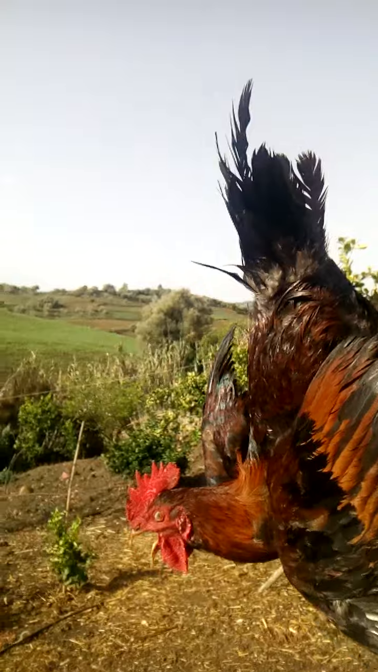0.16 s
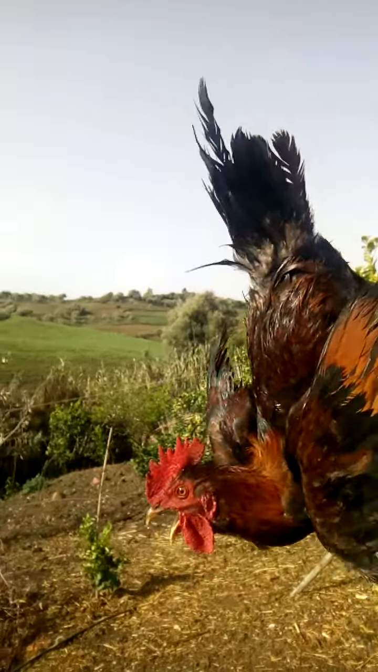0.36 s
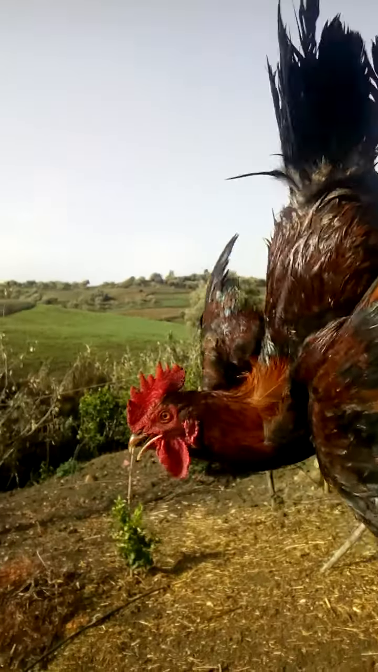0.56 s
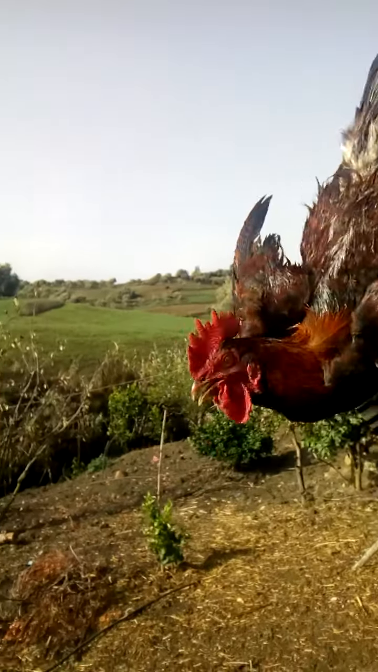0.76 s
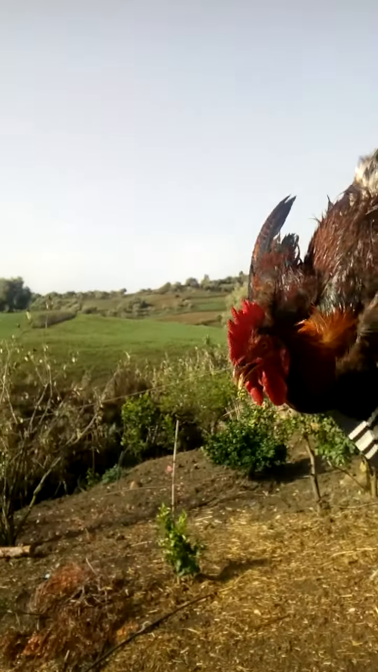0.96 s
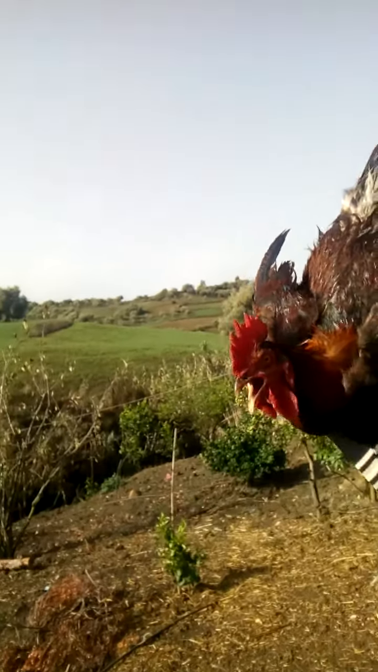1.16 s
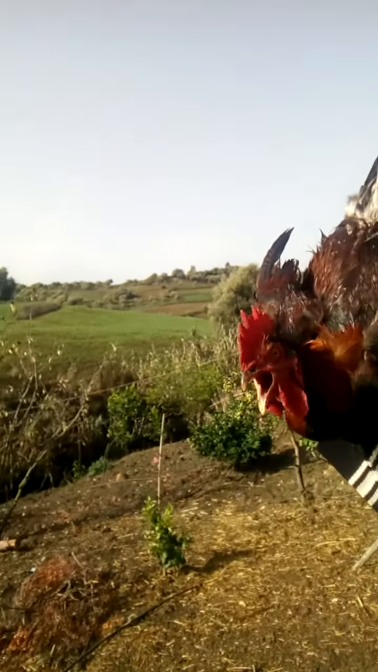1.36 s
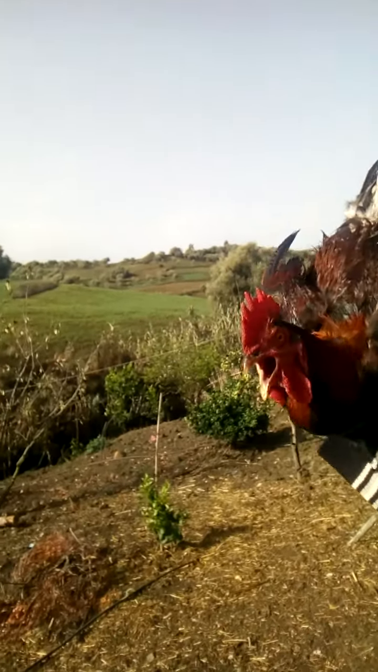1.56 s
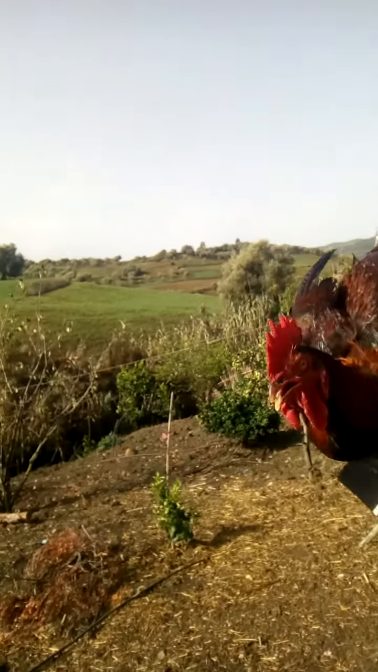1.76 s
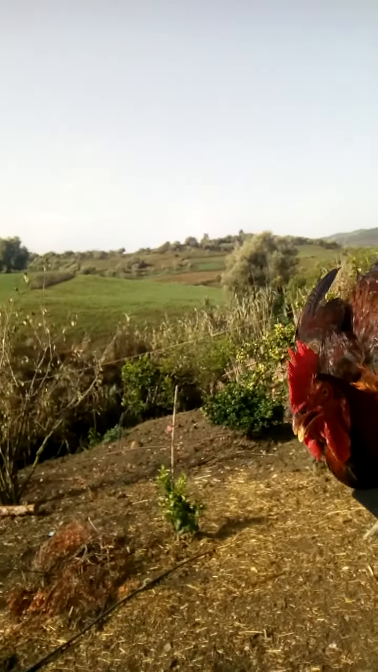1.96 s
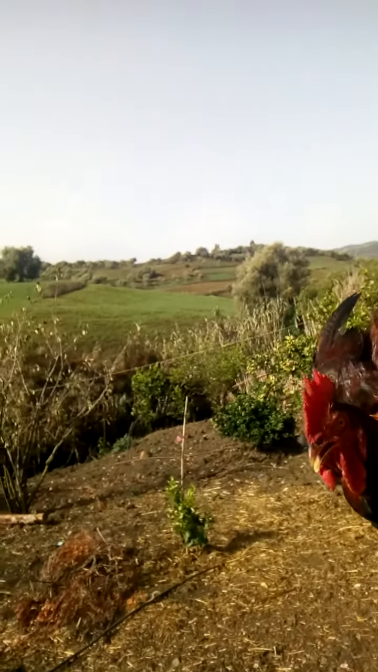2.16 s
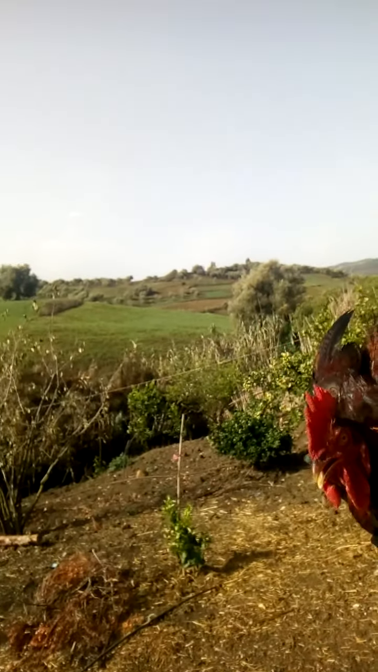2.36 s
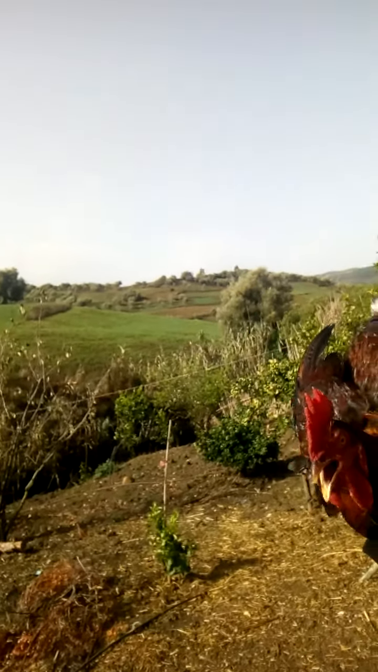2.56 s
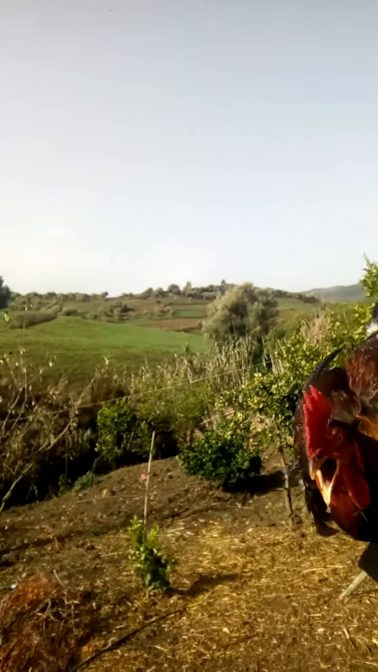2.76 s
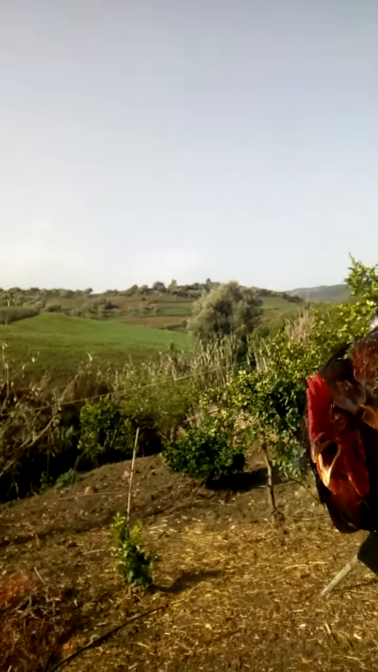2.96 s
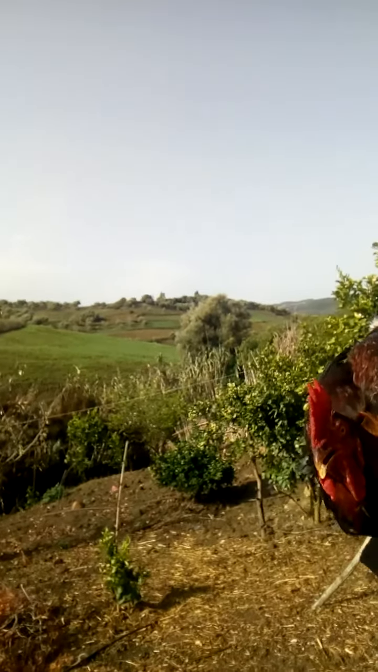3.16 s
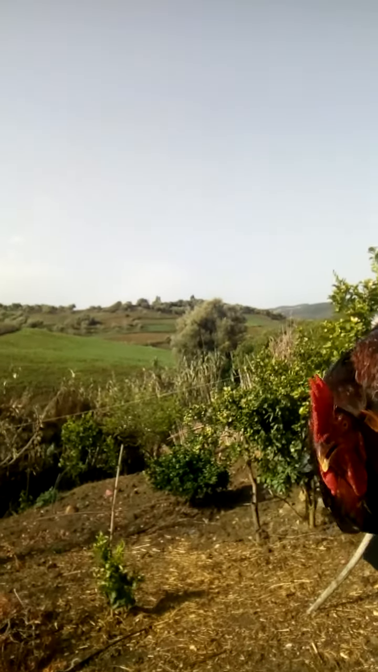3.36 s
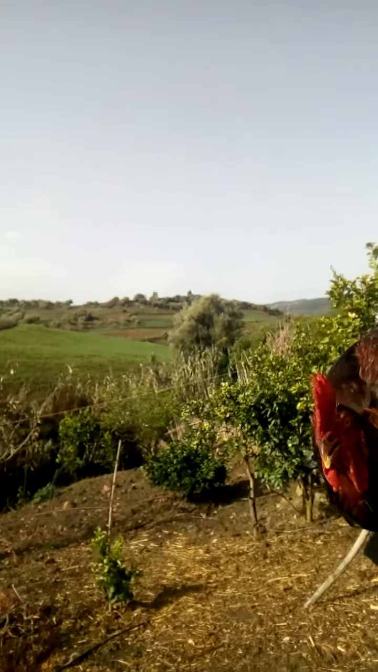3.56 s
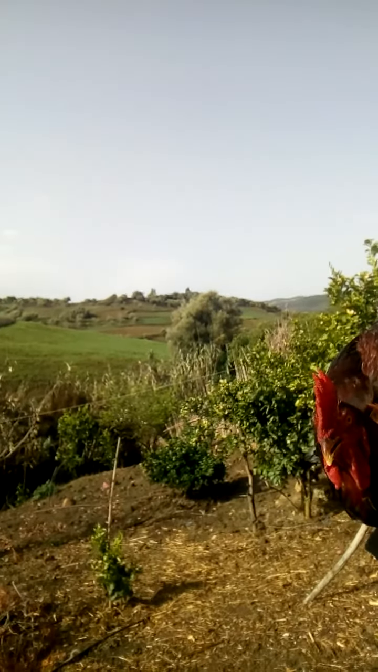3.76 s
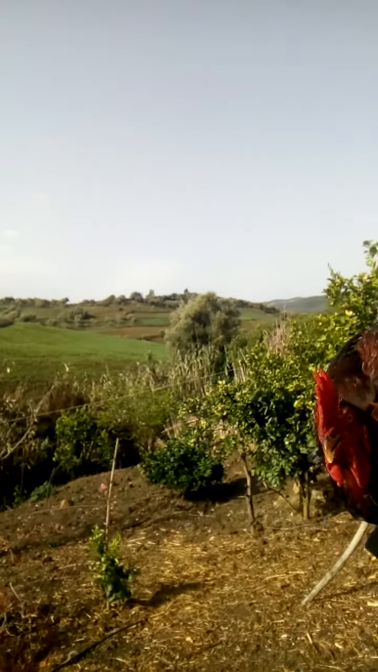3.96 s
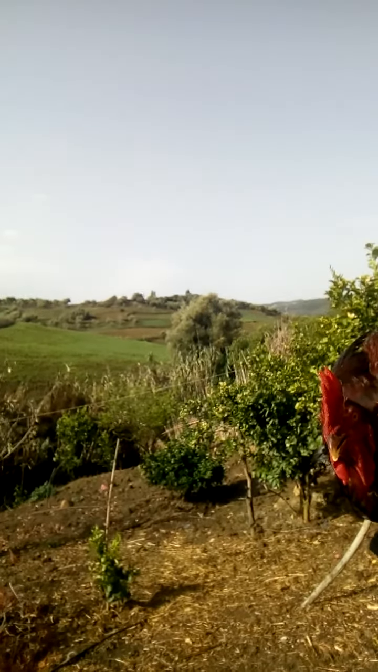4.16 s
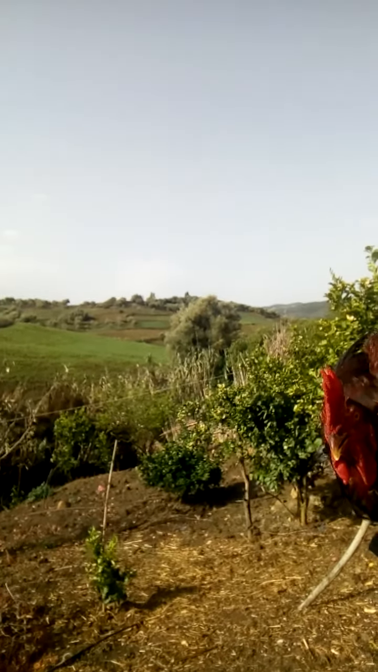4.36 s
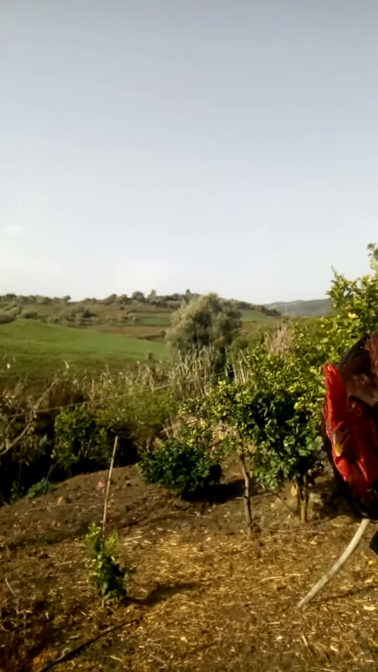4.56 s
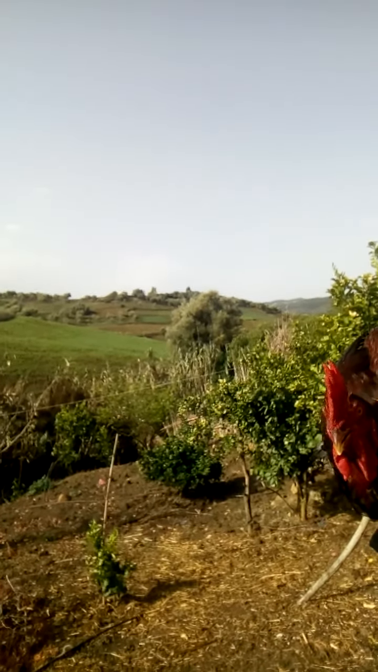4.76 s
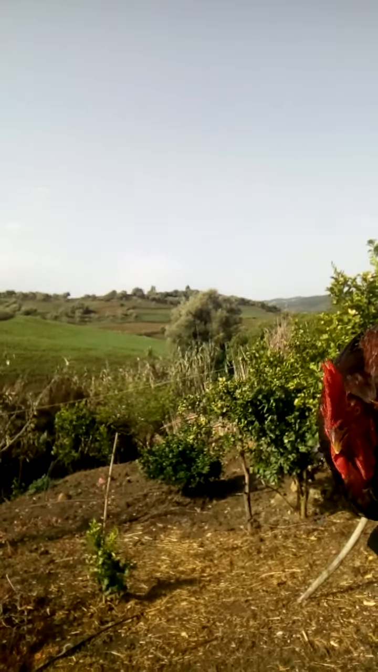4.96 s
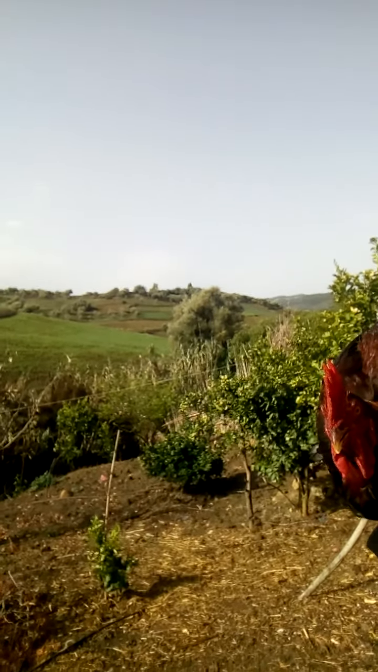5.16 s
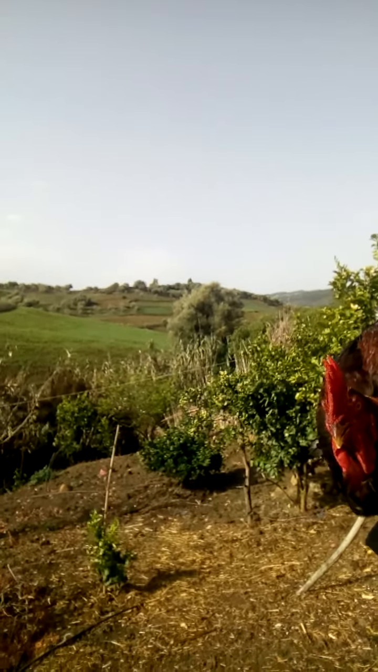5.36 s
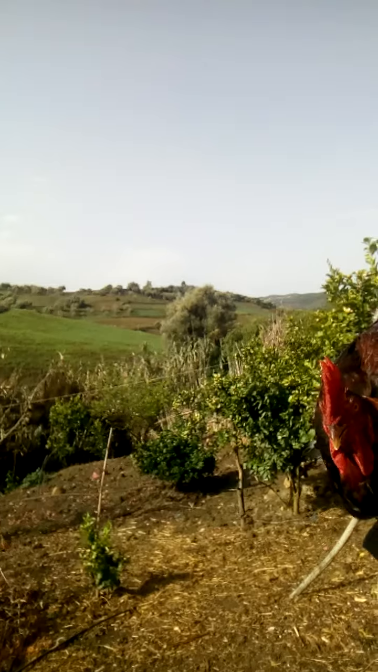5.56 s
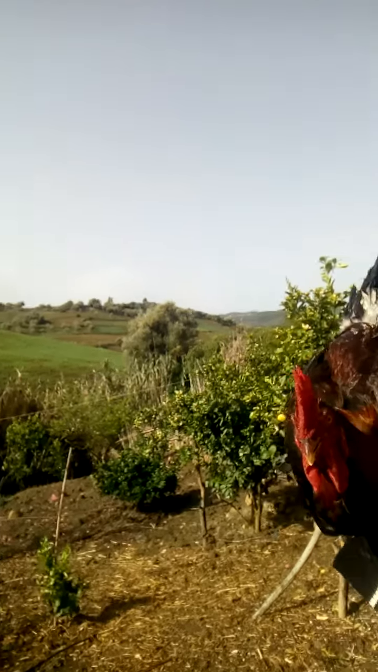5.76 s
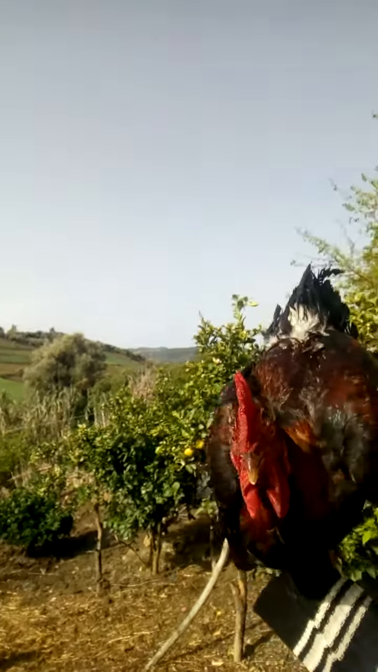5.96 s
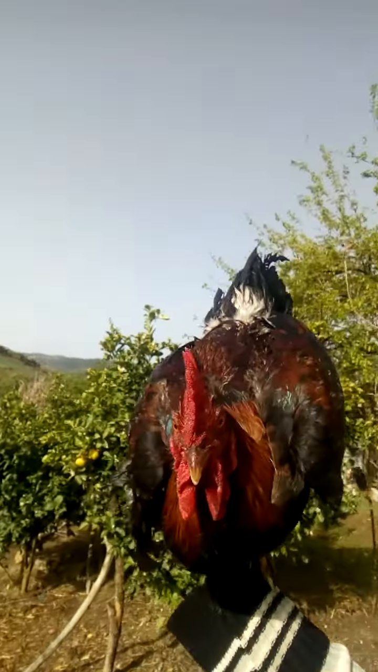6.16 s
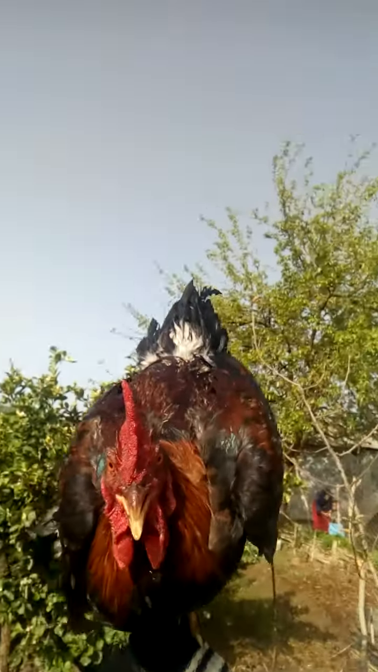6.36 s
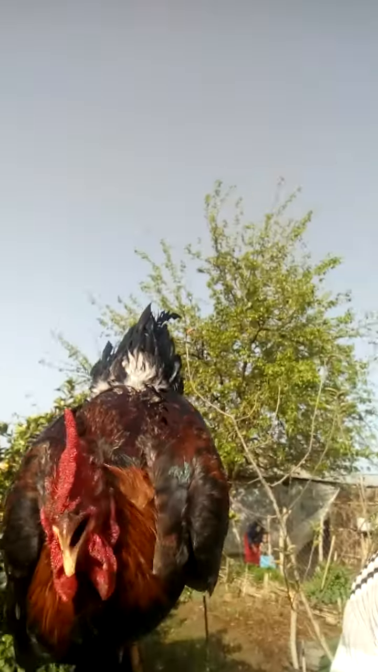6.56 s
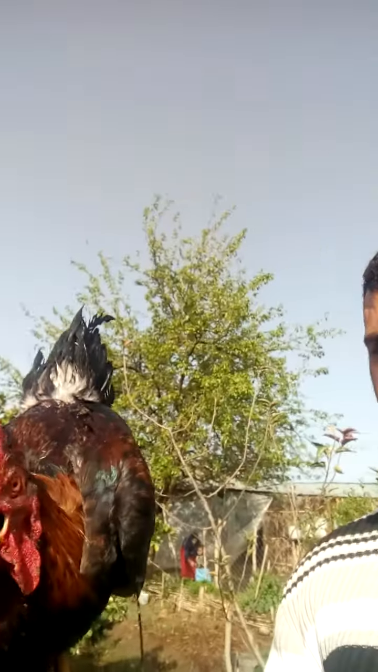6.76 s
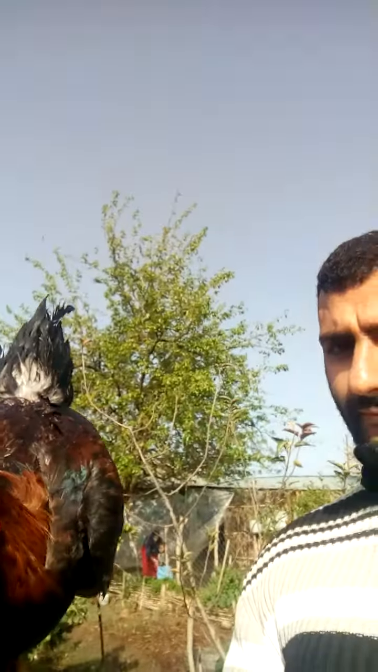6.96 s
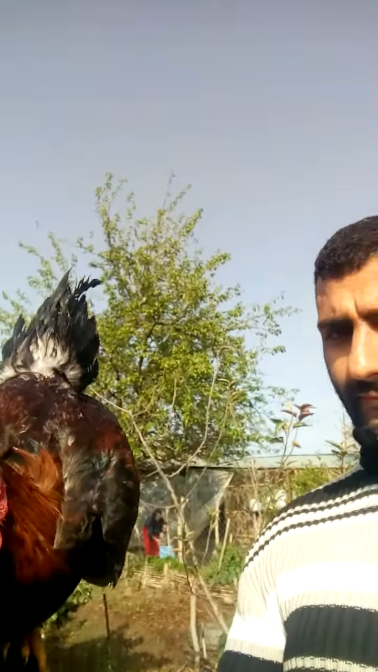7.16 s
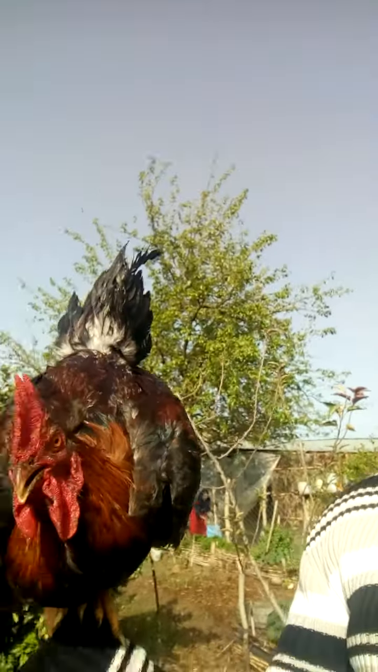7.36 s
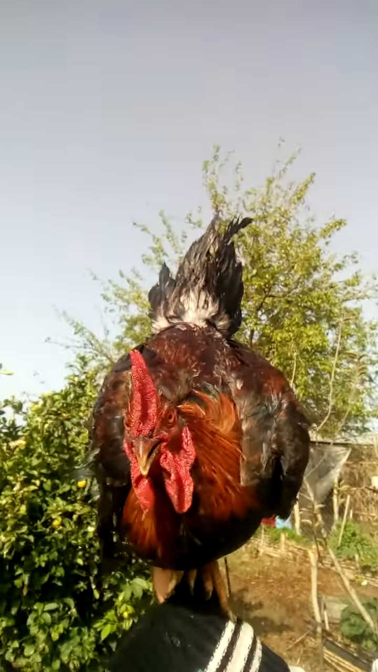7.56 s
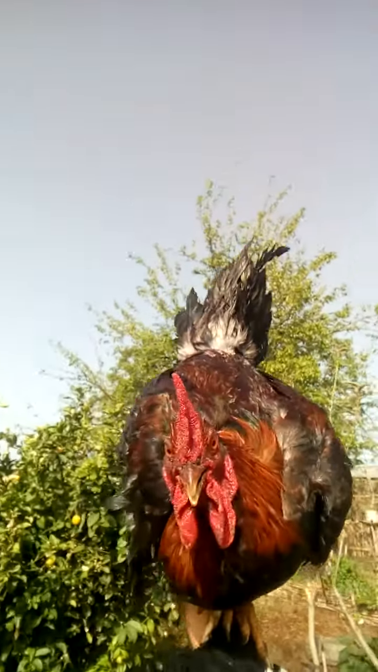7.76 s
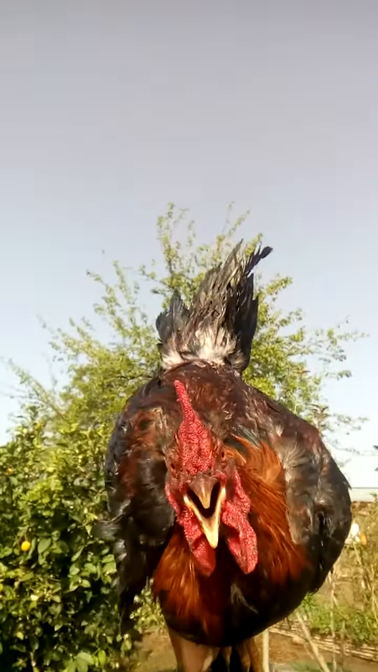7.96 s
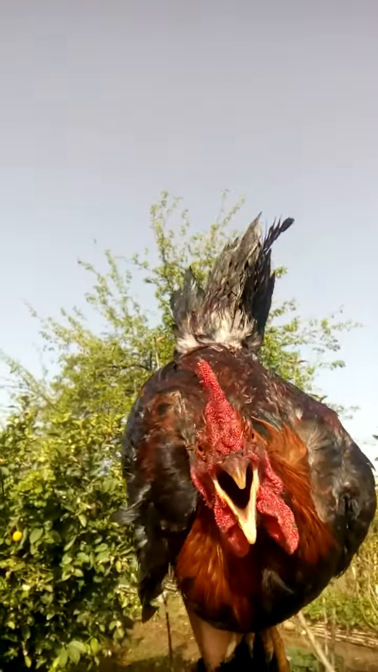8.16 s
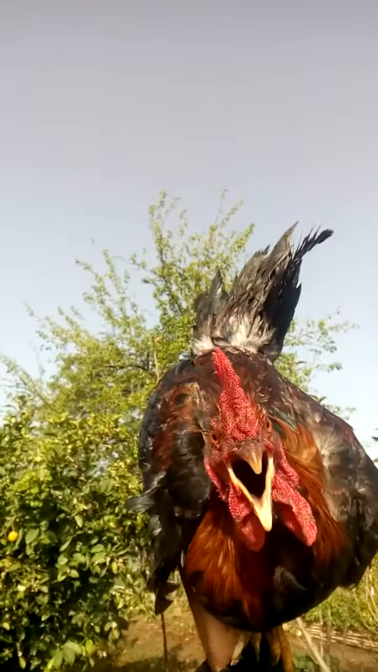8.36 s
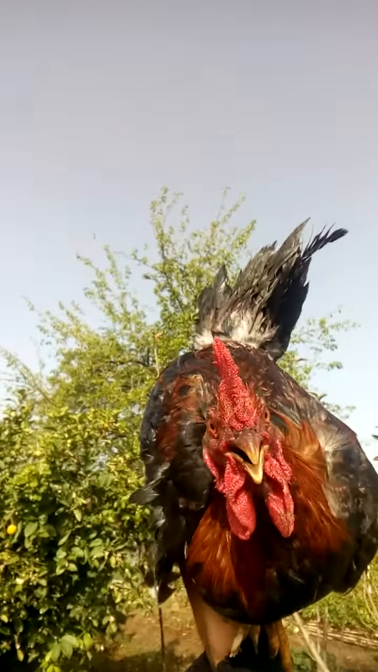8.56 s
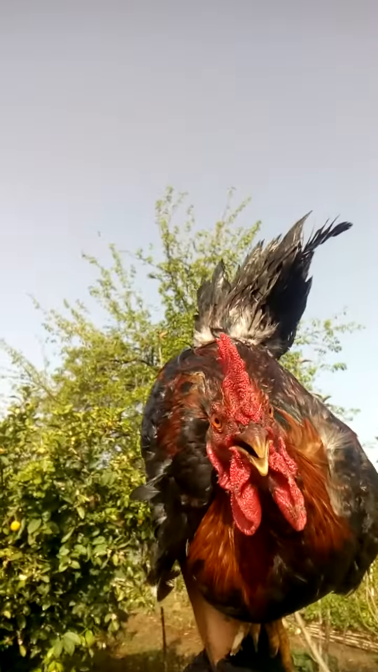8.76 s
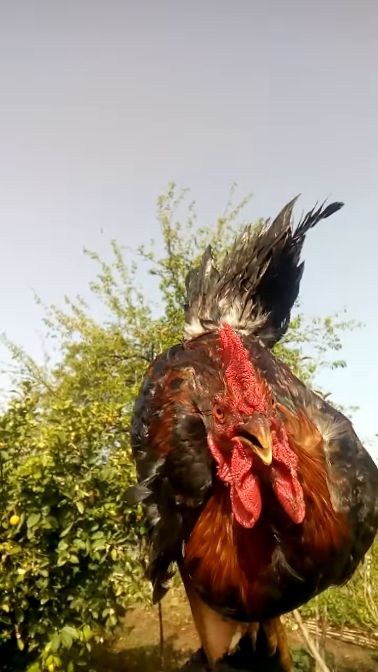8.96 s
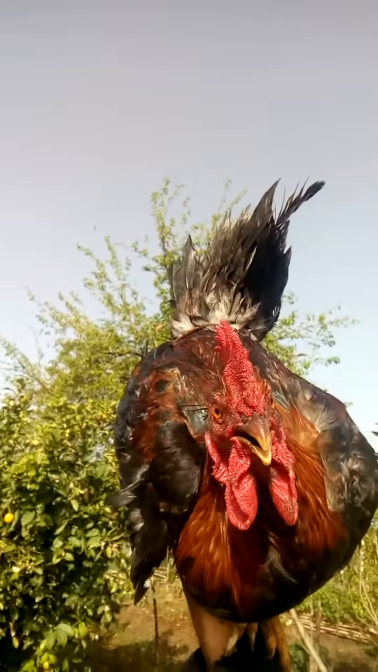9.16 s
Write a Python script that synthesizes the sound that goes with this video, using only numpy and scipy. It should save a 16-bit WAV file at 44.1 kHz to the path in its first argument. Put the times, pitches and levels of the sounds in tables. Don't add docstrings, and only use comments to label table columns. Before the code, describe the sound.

Five loud raspy rooster squawks, each growling up into a short nasal honk, over soft outdoor air, distant clucking and chirping birds.

```python
import sys
import numpy as np
from scipy import signal
from scipy.fft import rfft, irfft, next_fast_len
from scipy.io import wavfile
from scipy.ndimage import uniform_filter1d, minimum_filter1d, map_coordinates

SR = 44100
rng = np.random.default_rng(int(sys.argv[2]) if len(sys.argv) > 2 else 0)


def bounce(signal):
    frames = np.transpose(np.atleast_2d(signal))
    limited = np.clip(frames, -1, 1)
    pcm = np.round(limited * 32767).astype(np.int16)
    wavfile.write(sys.argv[1], SR, pcm)


def to_linear_factor(level_db):
    exponent = np.asarray(level_db, float) / 20
    return 10 ** exponent


N = 410130

# t/s, pitch f/Hz, level/dB, beak opening [0-1]
NOTE = [
    [(0.35, 573.5, -13, 0.7), (0.378, 563, -11, .5), (0.432, 474.7, -13.5, .55), (0.444, 497.6, -18, .4)],
    [(1.43, 538.2, -9.5, .55), (1.47, 555.8, -10.5, .65), (1.57, 561.1, -12, 0.8), (1.596, 542, -12, 0.6),
     (1.636, 471.5, -16.5, 0.5), (1.645, 493, -14, 0.3), (1.656, 489, -26, .4)],
    [(2.755, 510.2, -15.5, 0.2), (2.783, 541.5, -10.5, .4), (2.845, 552.8, -12, .65),
     (2.959, 541.9, -9, 0.1), (2.998, 477.8, -12.5, 0.4), (3.01, 502.6, -16, .4), (3.022, 490.3, -21.5, .3)],
    [(6.795, 523.3, -13, 0.4), (6.835, 565, -11, 0.5), (6.893, 551.8, -11.5, .55), (6.932, 491, -14, 0.6),
     (6.944, 516.7, -11.5, 1), (6.956, 488, -29.5, 0.7)],
    [(8.185, 586, -7.5, 0.67), (8.209, 577.7, -9, 0.8), (8.299, 586, -11, .95), (8.415, 571, -5.5, 0.7),
     (8.463, 525.6, -13, 0.5), (8.487, 496.4, -14, 0.8), (8.5, 513, -15, 0.5), (8.509, 507.7, -25, 0.3)],
]
HEAD_HZ = [100, 300, 500, 4100, 6200, 7500, 9000, 13500, 15200]
HEAD = [(-52.5, 5.5, 3.5, -11, -7, -11.5, -22.5, -25.5, -16.5),
        (-44, 4.5, -3.5, -1.5, -4, -16, -14, -21, -8.5), (-46, 1, -3, -3.5, -6, -15, -15.5, -22.5, -14),
        (-42.5, 2.5, -6, -8, 0.5, 3, -14, -22, -17.5), (-44.5, -4.5, 0.5, -4, -4, -13, -21, -23, -17)]
# over rasp level/dB, growth toward note/dB, over note level/dB
THIN = [(-27.5, 25.5, -31.5), (-29.5, 18, -28), (-29.5, 14, -27.5), (-17.5, 12, -25), (-30.5, 12, -25.5)]
# t/s, hold/s, length/s, level/dB, fall/dB
HICCUPS = [
    (1.106, 0.042, 0.066, -15, 6.5),
    (2.441, 0.04, 0.0616, -14, 15.5),
    (6.334, 0.023, .069, -12.5, 14.5),
    (6.407, 0.053, 0.06, -15, 20),
    (6.476, 0.09, .131, -13, 6.5),
    (7.866, 0.033, 0.064, -12, 18),
]
# t/s, end t/s, full level/dB
SWELLS = [
    (0, 0.371, -11),
    (1.17, 1.477, -10),
    (2.501, 2.8, -10.5),
    (6.604, 6.866, -10),
    (7.93, 8.202, -9.5),
]
# f/Hz, level/dB
HEN_THROAT = [(300, -22.5), (510, -5.5), (1060, 3), (1600, -12), (2150, -11), (2700, -22.5), (3800, -25),
              (5600, -29.5), (7000, -44), (9000, -75)]


def unit(x):
    return x / np.sqrt(np.mean(x ** 2) + 1e-20)


def along(points, hz):
    f, v = np.transpose(points)
    return np.interp(np.log(hz + 1), np.log(f + 1), v)


def span(rows, fade):
    s, *cols = np.transpose(rows)
    t = np.arange(s[0], s[-1], 1 / SR)
    gate = np.clip(np.minimum(t - s[0], s[-1] - t) / fade, 0, 1)
    return int(max(s[0], 0) * SR), gate, [np.interp(t, s, c) for c in cols]


def add(track, start, x):
    track[start:start + len(x)] += x[:len(track) - start]


def wobble(n, rate):
    knots = rng.standard_normal(int(n * rate / SR) + 4)
    return map_coordinates(knots, [np.arange(n) * rate / SR])


def causal(x, gain):
    m = 2 * next_fast_len(len(x) // 2 + 2048)
    cep = irfft(np.log(np.abs(gain(np.fft.rfftfreq(m, 1 / SR))) + 1e-6), m)
    cep[1:m // 2] *= 2
    cep[m // 2 + 1:] = 0
    return irfft(rfft(x, m) * np.exp(rfft(cep)), m)[:len(x)]


def band(x, lo_hz, hi_hz):
    hz = np.fft.rfftfreq(len(x), 1 / SR) + 1
    return irfft(rfft(x) / (1 + (lo_hz / hz) ** 16) / (1 + (hz / hi_hz) ** 16), len(x))


def noise_above(n, lo_hz):
    return band(rng.standard_normal(n), lo_hz, SR)


def split(x, top_db):
    top = band(x, 4000, SR)
    return unit(x - top) + to_linear_factor(top_db) * unit(top)


def unsteady(hz, wander_hz, throb_db):
    turn = 2 * np.pi * np.cumsum(hz + wander_hz * wobble(len(hz), 250)) / SR
    return unit(to_linear_factor(throb_db * np.tanh(wobble(len(hz), 160))) * np.sin(turn))


def pulses(pitch_hz, alternate, jitter, uneven_db, spread=0):
    n = len(pitch_hz)
    turn = 2 * np.pi * np.cumsum(pitch_hz * (1 + jitter * wobble(n, 130))) / SR
    train = np.zeros(n)
    for k in range(1, int(16000 / pitch_hz.min())):
        waver = to_linear_factor(uneven_db * np.sqrt(k) * wobble(n, 18))
        train += waver * np.cos(k * turn - spread * k * k)
    return train * (1 + np.clip(alternate, 0, 1) * np.cos(turn / 2))


def strikes(rate, gap_scatter, size_db):
    ticks = np.cumsum(np.exp(gap_scatter)) - 1
    beat = np.interp(np.cumsum(rate) / SR, ticks, np.arange(len(size_db)))
    at = np.flatnonzero(np.diff(np.floor(beat), prepend=-1))
    return np.bincount(at, to_linear_factor(size_db[:len(at)]), len(rate))


def air():
    # f/Hz, level/dB per Hz
    bed_colour = [(20, -16), (50, -3.5), (100, 3.5), (180, 1), (300, -1), (500, -5.5), (1000, -10.5),
                  (2000, -14), (3200, -13), (5000, -14.5), (6300, -17), (7500, -28.5), (13500, -30),
                  (15200, -20.5), (15800, -23)]
    # f/Hz, level/dB
    leaf_colour = [(1500, -29), (2800, -10), (4000, -6.5), (5300, 2), (6200, -6.5), (7200, -26),
                   (9000, -50.5)]
    # t/s, peak level/dB, spread/s
    gust_times = [(0, -47, 0.57), (.9, -59, 0.14), (1.6, -61, .6), (2.071, -59, 0.071), (2.33, -58, 0.097),
                  (4.391, -65.5, 0.11), (4.71, -62, 0.049), (5.35, -63, 0.27), (5.93, -62, 0.12),
                  (6.2, -68.5, 0.71), (7.2, -68, 0.82), (8.601, -60.5, .12)]
    bed_db, calm_db, fall_db = -66, -79.5, 16.5
    z = signal.stft(rng.standard_normal((2, N)), nperseg=512)[2]
    patches = uniform_filter1d(uniform_filter1d(rng.standard_normal(z.shape), 6, 1), 14, 2)
    bed, leaves = signal.istft(z * to_linear_factor(1.5 * unit(patches)), nperseg=512)[1][:, :N]
    t = np.arange(N) / SR
    breeze = to_linear_factor(calm_db) + sum(to_linear_factor(db - fall_db * np.abs(t - s) / spread) for s, db, spread in gust_times)
    rustle = breeze * unit(causal(leaves, lambda f: to_linear_factor(along(leaf_colour, f))))
    return to_linear_factor(bed_db) * unit(causal(bed, lambda f: to_linear_factor(along(bed_colour, f)))) + rustle


def echo(x, delay_s, decay):
    hz, t, z = signal.stft(rng.standard_normal(SR), SR, nperseg=256)
    tail = signal.istft(z * to_linear_factor(-60 * t / along(decay, hz)[:, None]), SR, nperseg=256)[1]
    return signal.fftconvolve(np.pad(x, (int(delay_s * SR), 0)), tail / np.linalg.norm(tail))[:N]


def swaying(x, depth):
    return x * (1 + depth * wobble(N, 500))


def twig():
    # t/s, peak level/dB
    cracks = [
        (5.8369, -26.5),
    ]
    # f/Hz, level/dB
    crack_colour = [(150, -17), (400, -20), (1000, -21), (2300, -5), (3500, -5.5), (5200, 5), (6500, 0),
                    (8500, -33), (15500, -37.5)]
    # f/Hz, level/dB, t60/s
    wood_modes = [(2530, -12.5, 0.019), (3360, -9, 0.018), (5300, 2, 0.033), (6300, -9, 0.024),
                  (8560, -27, 0.02), (11800, -28.5, 0.019), (14900, -27, 0.016)]
    out, t = np.zeros(N), np.arange(SR // 6) / SR
    for s, db in cracks:
        crumble = to_linear_factor(-60 * t / 0.12 + 3.8 * wobble(len(t), 150))
        crumble = 0.69 * np.clip((t - .008) / 0.016, 0, 1) * crumble
        burst = (to_linear_factor(-60 * t / 0.025) + crumble) * rng.standard_normal(len(t))
        crack = causal(burst, lambda f: to_linear_factor(along(crack_colour, f)))
        ring = sum(to_linear_factor(level - 60 * t / t60) * np.sin(2 * np.pi * hz * t) for hz, level, t60 in wood_modes)
        add(out, int(s * SR), to_linear_factor(db) * (crack / np.abs(crack).max() + 0.31 * ring))
    return out


def songs():
    # t/s, top f/Hz, level/dB
    trill = [(3.721, 6250, -43), (3.78, 5840, -43), (3.849, 5900, -47), (5.14, 6130, -42.5),
             (5.2, 6190, -45), (5.262, 5930, -48), (5.326, 5800, -48.5), (5.39, 6030, -43.5),
             (5.46, 5540, -49.5)]
    # t/s, length/s, last f/Hz, level/dB
    swoops = [
        (2.324, 0.03, 3070, -51),
        (3.141, 0.029, 3940, -64.5),
        (3.342, 0.024, 3970, -69),
        (4.412, 0.029, 3020, -45),
    ]
    # t/s, length/s, first f/Hz, last f/Hz, level/dB
    whistles = [(2.281, .055, 4500, 5200, -53), (2.405, .018, 5820, 5540, -51),
                (2.281, .028, 6730, 6575, -60), (2.342, .034, 6400, 5700, -54.5), (.82, .07, 518, 520, -64),
                (1.04, .032, 6850, 7100, -65), (7.761, .03, 4500, 4900, -64),
                (3.655, .023, 7300, 6600, -49.5), (3.705, .017, 4900, 7760, -68),
                (3.765, .017, 5300, 7300, -62), (4.365, .049, 6180, 6100, -55.5),
                (4.37, .045, 3370, 3180, -65), (4.37, .03, 4650, 4900, -62), (4.368, .03, 5400, 5600, -60),
                (4.68, .045, 3050, 2950, -70), (4.402, .0112, 3600, 5900, -47.5),
                (5.08, .07, 7050, 6800, -63), (5.555, .026, 4350, 4380, -66.5),
                (6.08, .04, 4290, 4270, -64.5), (6.235, .025, 4500, 4000, -62),
                (3.335, .03, 6100, 4600, -66), (4.5, .109, 1650, 1710, -75), (4.62, .14, 1610, 1800, -71.5),
                (4.74, .53, 1840, 1740, -77), (4.026, .36, 4330, 4280, -75), (5.58, .15, 1675, 1640, -78)]
    notes = [(s, .025, 0.76 * hz, hz, .9 * hz, db) for s, hz, db in trill]
    notes += [(s, length, 4500, 4700, hz, db) for s, length, hz, db in swoops]
    return notes + [(s, length, a, a + .22 * (b - a), b, db) for s, length, a, b, db in whistles]


def birds():
    out = np.zeros(N)
    for s, length, a_hz, b_hz, c_hz, db in songs():
        u = np.arange(0, 1, 1 / (length * SR))
        hz = np.interp(u, [0, .22, 1], [a_hz, b_hz, c_hz])
        hz = uniform_filter1d(hz, len(u) // 5, mode="nearest")
        swell = np.sin(np.pi * u) ** .7 * to_linear_factor(1.4 * wobble(len(u), 40))
        turn = 2 * np.pi * np.cumsum(hz * (1 + .016 * wobble(len(u), 400))) / SR
        add(out, int(s * SR), to_linear_factor(db + 4.5) * swell * np.sin(turn))
    return out


def soft_voice(table, throat, breath_db):
    out, break_s = np.zeros(N), .05
    for rows in table:
        start, gate, (pitch_hz, level_db, *uneven) = span(rows, fade=0.011)
        n = len(gate)
        train = unit(pulses(pitch_hz, uneven[0] if uneven else .03, jitter=0.0042, uneven_db=2.0))
        left_s = (n - np.arange(n)) / SR
        breaks = np.clip(1 - left_s / break_s, 0, .9) * (n > SR / 10)
        train = (1 - breaks) * train + (to_linear_factor(breath_db) + 0.31 * breaks) * rng.standard_normal(n)
        train = train - np.sqrt(breaks) * band(train, 1400, SR)
        add(out, start, gate * to_linear_factor(level_db) * unit(causal(train, lambda f: to_linear_factor(along(throat, f)))))
    return out


def hen():
    # t/s, pitch f/Hz, level/dB
    long_notes = [
        [(3.598, 517, -40), (3.616, 509, -40.5), (3.716, 538.7, -44), (3.876, 546, -42), (3.888, 525, -39.5),
         (3.925, 476, -45)],
        [(7.497, 508, -45), (7.507, 513, -42.5), (7.529, 517.4, -46), (7.765, 553, -46), (7.8, 479, -45.5),
         (7.83, 466, -41)],
    ]
    # peak t/s, pitch f/Hz, level/dB, uneven pairs [0-1]
    cluck_times = [
        (0.683, 452.4, -48.5, 0.17),
        (.933, 454, -42, 0.2),
        (3.258, 430, -47, 0.73),
        (3.5, 450.7, -48, 0.17),
        (7.35, 377, -54.5, 0),
    ]
    # t from peak/s, pitch share [1], level/dB
    cluck_arch = [(-.026, .89, -11.5), (0, 1.001, 1.4), (.027, .92, -5.5)]
    # f/Hz, level/dB
    cluck_throat = [(250, -34), (450, -11.5), (880, 3.5), (1330, -3.5), (1800, -4.5), (2300, -27),
                    (3500, -23), (7000, -53)]
    clucks = [[(s + lag, hz * share, db + drop_db, uneven) for lag, share, drop_db in cluck_arch]
              for s, hz, db, uneven in cluck_times]
    drawn_out = soft_voice(long_notes, HEN_THROAT, breath_db=-21)
    return drawn_out + soft_voice(clucks, cluck_throat, breath_db=-22)


def whines():
    # t/s, pitch f/Hz, level/dB
    lead_ins = [
        [(1.085, 602, -55.5), (1.11, 609, -48)],
        [(2.43, 464.6, -51.5), (2.446, 496.7, -30)],
        [(6.32, 486, -54), (6.338, 512, -31.5)],
        [(7.845, 440.8, -52.5), (7.862, 500, -21.5), (7.876, 524, -19.5)],
    ]
    return soft_voice(lead_ins, HEN_THROAT, breath_db=-18)


def pockets(f, call):
    # low f/Hz, depth/dB, high f/Hz, depth/dB
    dips = [(4000, 10, 7100, 16), (4076, 5, 7350, 16), (4000, 8.5, 6750, 14), (4100, 4.5, 5850, 14),
            (4100, 2.5, 8800, 10.5)]
    width = .035
    low_hz, low_db, high_hz, high_db = dips[call]
    low_dip = low_db * np.exp(-((f / low_hz - 1) / width / 2) ** 2)
    high_dip = high_db * np.exp(-((f / high_hz - 1) / width) ** 2)
    return to_linear_factor(-low_dip - high_dip)


def bursts():
    # t/s, length/s, level/dB
    croaks = [
        (0.431, .028, -8.5),
        (1.634, 0.049, -12),
        (3.0, 0.043, -9),
        (6.936, .032, -8),
        (8.493, .042, -16),
    ]
    onset_db, hiccup_rise_s, swell_rise_s = -13.5, 0.0018, 0.0069
    rows = [[(s, db + onset_db), (s + hiccup_rise_s, db), (s + hold, db), (s + length, db - fall_db)]
            for s, hold, length, db, fall_db in HICCUPS]
    rows += [[(s, db + onset_db * (s > .01)), (s + swell_rise_s, db), (end, db)] for s, end, db in SWELLS]
    rows += [[(s - .005, db - 13), (s, db), (s + 0.33 * length, db - 5.5), (s + length, db - 35.5)]
             for s, length, db in croaks]
    return sorted(rows)


def effort(call, since, near, level_db):
    # first f/Hz, highest f/Hz, sheen/dB at full effort
    pipe = [(1178, 1280, -14), (1182, 1346, -15), (1037, 1265, -11), (1009, 1300, -15), (1111, 1500, -12)]
    if since[0] > 0:
        dull_db = np.maximum(2.37 * (level_db - level_db.max()), -16)
        return level_db, -17.5 + dull_db, 1013 + 0 * since, -4.5 + 0.53 * dull_db
    first_hz, top_hz, sheen_db = pipe[call]
    lock_s = NOTE[call][0][0]
    begun_s = min(row[0] for row in HICCUPS + SWELLS if row[0] > lock_s - .6) - lock_s
    level_db = level_db - 9.5 * (1 - near) ** 2 * (since[-1] > 0)
    slack_db = np.clip(level_db + 9.5, -12, 5)
    ring_hz = np.interp(since, [begun_s, -.09, .03], [first_hz, top_hz, 2.5 * NOTE[call][1][1]])
    top_db = sheen_db + .9 * slack_db - 7.5 * (1 - near)
    mid_db = -2.5 + 0.72 * slack_db - 2.5 * (1 - near)
    return level_db, top_db, ring_hz, mid_db


def rasp():
    # f/Hz, width/Hz, level/dB
    throat_modes = [(740, 490, -9.5), (1240, 287, -1.5)]
    # f/Hz, width/Hz, level/dB
    gullet = [
        [(2030, 210, 0.5), (2760, 210, -4), (3210, 230, -1.5), (4550, 400, -16), (5360, 330, -13)],
        [(2070, 230, 0), (2810, 240, -3), (3180, 260, -3.5), (5000, 500, -17), (5600, 520, -14)],
        [(2150, 190, 0.5), (2700, 200, -0.5), (3242, 220, -2), (5160, 350, -13), (5900, 450, -14.5)],
        [(2040, 160, -1.5), (2940, 170, -2), (3412, 320, -8), (5140, 1700, -18), (6440, 1000, -18)],
        [(2051, 390, -3), (2970, 280, -0.5), (3390, 350, -3.5), (4800, 720, -17.5), (5660, 600, -14.5)],
    ]
    # t/s, spread/s, loss/dB
    chokes = [(0.055, .004, 3.5), (.088, 0.003, 4), (0.162, 0.0027, 4), (.209, 0.0017, 5.5),
              (0.271, 0.0013, 4), (1.157, 0.004, 10.5), (1.223, 0.0027, 4.5), (2.453, .003, 9),
              (2.477, .003, 8.5), (2.521, 0.0013, 5.5), (2.552, 0.0029, 5), (2.596, 0.0026, 7.5),
              (2.669, 0.0022, 1.5), (6.376, 0.0027, 11), (6.385, 0.0021, 7.5), (6.524, 0.0042, 6.5),
              (6.554, 0.0024, 10.5), (6.593, 0.0023, 4), (6.628, 0.0021, 5), (6.646, 0.0026, 3.5),
              (7.887, 0.0018, 5), (7.981, 0.0019, 9), (8.01, 0.0019, 5), (8.119, 0.0036, 3.5)]
    ring_wander_hz, under_wander_hz = 40, 22
    out = np.zeros(N)
    locks_s = np.array([rows[0][0] for rows in NOTE])
    for rows in bursts():
        start, gate, (level_db,) = span(rows, fade=0.0012)
        n = len(gate)
        call = np.argmin(np.abs(locks_s - start / SR - .1))
        t = (start + np.arange(n)) / SR
        since = t - locks_s[call]
        near = np.clip(1 + since / .45, 0, 1)
        shut = since[0] > 0
        level_db, top_db, ring_hz, mid_db = effort(call, since, near, level_db)

        luck = rng.standard_normal((400, 4))
        slap_hz = ring_hz / 2 if shut else 135 + 130 * near ** 2
        slaps = strikes(slap_hz, (.07 if shut else .24) * luck[:, 0], 3 * np.tanh(luck[:, 1]))
        spray = rng.standard_normal(130) * .3 + (np.arange(130) == 0)
        spray = to_linear_factor(-60 * np.arange(130) / SR / .003) * spray
        slaps = np.convolve(slaps, spray)[:n]
        flutter = strikes(ring_hz / 2, .15 * luck[:, 2], 5 * np.tanh(luck[:, 3]))
        source = unit(slaps) + to_linear_factor(-8 + 3 * near) * unit(flutter) + to_linear_factor(-20) * rng.standard_normal(n)

        head = list(zip(HEAD_HZ, HEAD[call]))

        def throat(f):
            modes = 0
            for k, (c, w, db) in enumerate(throat_modes + gullet[call]):
                modes = modes + (-1) ** k * to_linear_factor(db) * 1j * f * w / (c * c - f * f + 1j * f * w)
            return pockets(f, call) * to_linear_factor(along(head, f)) * np.abs(modes) ** 1.087

        voice = causal(source, throat)
        mid = band(voice, 1750, 3850)
        voice = split(voice - mid, top_db + 7.0) + to_linear_factor(mid_db + 4.0) * unit(mid)
        voice = voice * to_linear_factor(-6.0 * shut)

        kick = np.convolve(np.abs(slaps), np.hanning(260))[165:n + 165]
        ring = unit(unsteady(ring_hz, ring_wander_hz, throb_db=3) * (0.31 + unit(kick)))
        voice = voice + to_linear_factor(6.0 - 14 * near ** 4 * (not shut)) * ring
        under = unsteady(ring_hz * (.52 + 0.18 * near ** 3), under_wander_hz, throb_db=1.5)
        voice = voice + to_linear_factor(-8.5) * under * (not shut)
        early = unsteady(np.full(n, 2 * NOTE[call][0][1]), under_wander_hz, throb_db=1)
        voice = voice + to_linear_factor(-5.0 + 120 * np.minimum(since, 0)) * early * (not shut)
        voice = voice + to_linear_factor(-29.0 - 9.0 * near) * unit(band(source, 40, 370))

        over_db, growth_db, _ = THIN[call]
        thin = band(slaps * to_linear_factor(5.0 * wobble(n, 60)) + .1 * source, 7800, SR)
        thin = unit(causal(thin, lambda f: to_linear_factor(along(head[-3:], f))))
        voice = voice + to_linear_factor(top_db + over_db - growth_db * (1 - near)) * thin

        gulp = to_linear_factor(-20.5) * unit(band(source, 230, 420)) * np.clip((since - since[0]) / 0.025, 0, 1) ** 2
        voice = voice + (gulp - 0.66 * band(voice, 410, 680)) * shut

        yield_db = -11 * np.clip(since / .045, 0, 1) * (not shut)
        yield_db = yield_db - sum(loss_db * np.exp(-((t - s) / spread) ** 2) for s, spread, loss_db in chokes)
        add(out, start, gate * to_linear_factor(level_db - 9.5 + yield_db) * voice)
    return out


def slips():
    # t/s, f/Hz, level/dB, spread/s
    catches = [
        (1.566, 2776, -6.5, .001),
        (1.584, 2000, -28.5, .001),
        (1.605, 2912, -19.5, 0.00079),
        (8.342, 5600, -29.5, .0003),
        (8.517, 868, -15, 0.0053),
        (8.518, 1220, -15.5, 0.0033),
        (8.518, 283, -33.5, 0.0048),
        (8.518, 2300, -33, 0.00045),
    ]
    out, t = np.zeros(N), np.arange(-600, 600) / SR
    for s, hz, db, spread in catches:
        add(out, int(s * SR) - 600, to_linear_factor(db) * np.exp(-(t / spread) ** 2) * np.sin(2 * np.pi * hz * t))
    return out


def note():
    # multiple of pitch [1], level/dB
    beak_colour = [
        [(1, -11.5), (2, 0.5), (3, -5), (4, -3.5), (5, -13), (6, -1.5), (7, -18), (8, -18.5), (9, -12),
         (10, -14), (11, -20), (12, -20)],
        [(1, -15), (2, 1), (3, -3.5), (4, -1), (5, -2.5), (6, -12.5), (7, -22.5), (8, -16), (9, -9),
         (10, -18.5), (11, -22), (12, -26.5)],
        [(1, -18.5), (2, -0.5), (3, -8), (4, -1), (5, -9.5), (6, -15), (7, -29.5), (8, -17.5), (9, -9.5),
         (10, -23.5), (11, -13.5), (12, -38)],
        [(1, -16.5), (2, -3), (3, -9.5), (4, -4.5), (5, -16), (6, -2.5), (7, -14), (8, -14), (9, -10),
         (10, -6.5), (11, -17.5), (12, -13.5)],
        [(1, -9.5), (2, 1.5), (3, -3), (4, 0), (5, 3), (6, -0.5), (7, -20.5), (8, -14), (9, -11.5), (10, -10.5),
         (11, -17), (12, -26)],
    ]
    # depth [0-1], settling time/s
    doubling = [(0.7, 0.043), (.15, 0.025), (1, 0.023), (1, 0.052), (0.5, 0.013)]
    # breath/dB, late sheen/dB, pairs return depth [0-1], at t into note/s, jitter [0-1]
    fraying = [(-20.5, 15.5, .05, .06, 0.02), (-38, 11.5, .01, .1, 0), (-39, 7, 0, 0.18, 0),
               (-32, 24.5, 0, 0.13, 0), (-41, 6, 0, 0.17, 0)]
    top_lag_s, closing_db, closing_s = 0.05, 32, 0.0096
    out = np.zeros(N)
    for call, rows in enumerate(NOTE):
        depth, settle_s = doubling[call]
        breath_db, lag_db, again, again_s, jitter = fraying[call]
        start, gate, (pitch_hz, level_db, opening) = span(rows, fade=0.0014)
        n = len(gate)
        t = np.arange(n) / SR
        pitch_hz = uniform_filter1d(pitch_hz, size=700, mode="nearest")
        closing = closing_db * np.exp((t - t[-1]) / closing_s)
        top_db = -8 + 2.5 * opening - lag_db * np.exp(-(t / top_lag_s) ** 2) - closing
        mid_db = -16 + 15.5 * opening - .3 * closing
        gate = gate * np.clip(t / settle_s / .7, 0, 1)

        alternate = 0.0046 + depth / (1 + (t / settle_s) ** 6) + again * np.exp(-((t - again_s) / 0.041) ** 2)
        train = unit(pulses(pitch_hz, alternate, jitter=jitter, uneven_db=0.84, spread=.2))
        train = train * to_linear_factor(0.62 * wobble(n, 200))
        sag = np.clip(8.0 * (1 - pitch_hz / pitch_hz.max()), 0, 1) * (t > 2 * settle_s)
        pulsing = np.abs(unit(uniform_filter1d(train, size=30)))
        train = train + to_linear_factor(-5) * sag * noise_above(n, 4300) * pulsing
        train = train + to_linear_factor(breath_db) * rng.standard_normal(n) + to_linear_factor(-9) * noise_above(n, 6500)

        sheen = [(hz, db + THIN[call][2]) for hz, db in zip(HEAD_HZ[-4:], HEAD[call][-4:])]
        overtones = [(k * np.median(pitch_hz), db) for k, db in beak_colour[call]]
        shape = [(100, -63.5)] + overtones + sheen
        voice = causal(train, lambda f: to_linear_factor(along(shape, f)) * pockets(f, call) ** .5)
        mid = band(voice, 2450, 3850)
        voice = split(voice - mid, top_db) + to_linear_factor(mid_db + 1.5) * unit(mid)
        add(out, start, gate * to_linear_factor(level_db - 2.5) * voice)
        gusts = to_linear_factor(9.0 * wobble(n, 41)) * band(rng.standard_normal(n), 25, 340)
        add(out, start, gate * to_linear_factor(level_db - 51.5) * unit(gusts))
    return out + slips()


def scene():
    # f/Hz, t60/s
    trunks = [(300, 0.25), (1000, 0.31), (5000, 0.15), (9000, 0.22)]
    # f/Hz, t60/s
    slope = [(300, 0.6), (1000, 0.59), (3000, 0.57), (6000, 0.75), (9000, 0.36)]
    cock, flock, song, crack = -rasp() - note() - whines(), hen(), birds(), twig()
    near = cock + to_linear_factor(-32.5) * echo(swaying(cock, depth=1.1), 0.017, trunks)
    near = near + to_linear_factor(-46.0) * echo(swaying(cock, depth=2.5), 0.043, slope)
    near = near + crack + to_linear_factor(1.5) * echo(crack, 0.0048, trunks)
    far = flock + to_linear_factor(-10.0) * echo(swaying(flock, depth=0.46), 0.0054, trunks)
    far = far + song + to_linear_factor(-8.5) * echo(swaying(song, depth=.9), 0.0072, trunks)
    far = far + to_linear_factor(-17.0) * echo(swaying(song, depth=0.99), 0.028, slope)
    return np.tile(near + far + air(), (2, 1))


def low_pass(x):
    return signal.sosfilt(signal.butter(12, 16410, fs=SR, output="sos"), x)


def record(dry):
    need = np.minimum(1, .81 / (np.abs(dry) + 1e-9))
    held = dry * uniform_filter1d(minimum_filter1d(need, size=133), size=131)
    kept = irfft(rfft(held) * (np.fft.rfftfreq(N, 1 / SR) < 15850), N)
    return low_pass(kept)


dry = scene()
out = record(dry)
bounce(out)
```